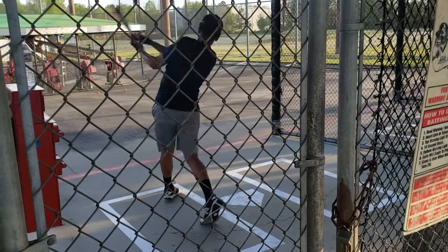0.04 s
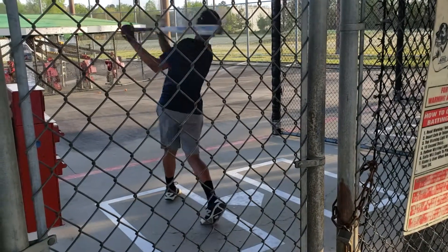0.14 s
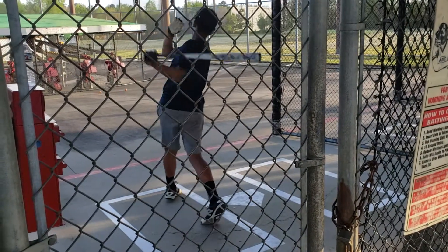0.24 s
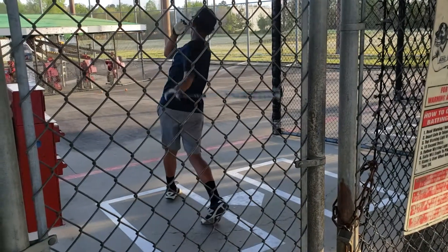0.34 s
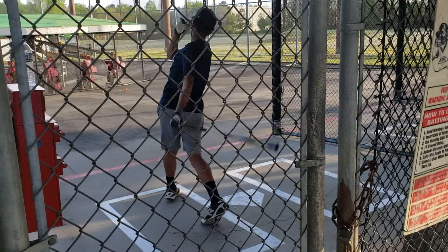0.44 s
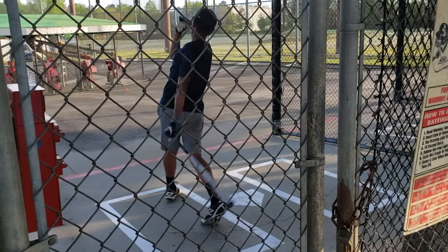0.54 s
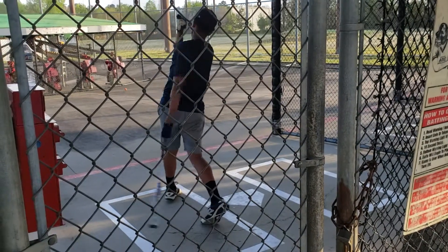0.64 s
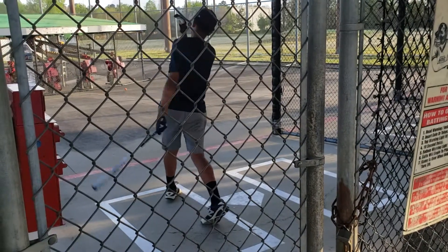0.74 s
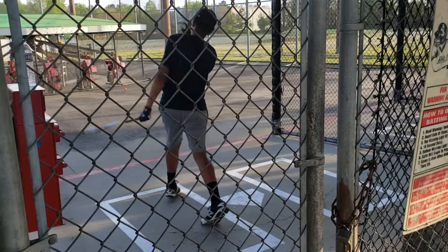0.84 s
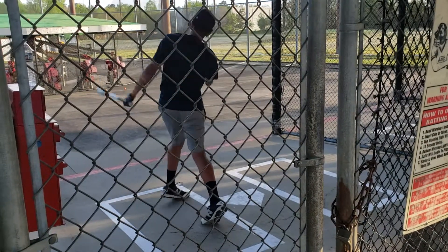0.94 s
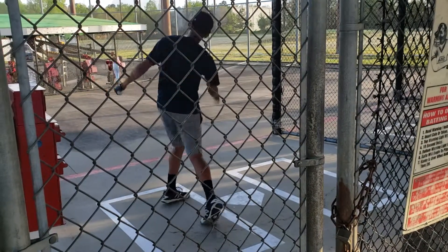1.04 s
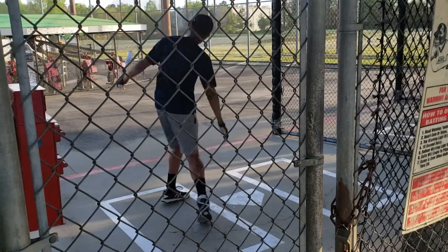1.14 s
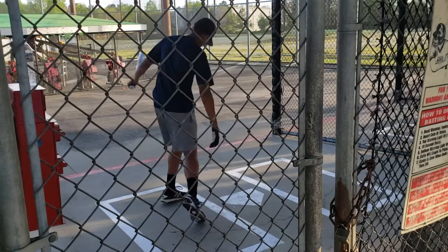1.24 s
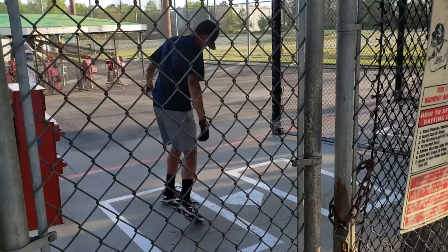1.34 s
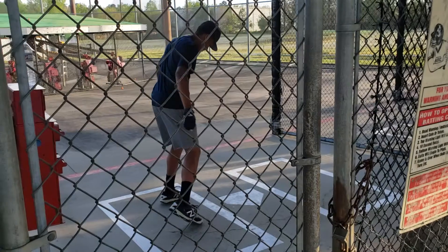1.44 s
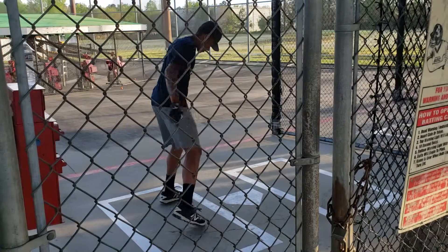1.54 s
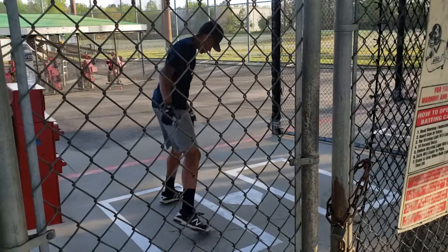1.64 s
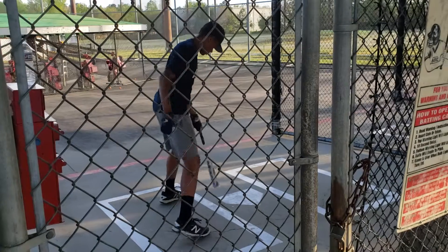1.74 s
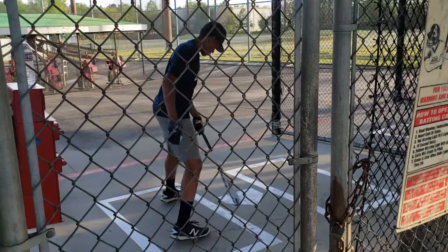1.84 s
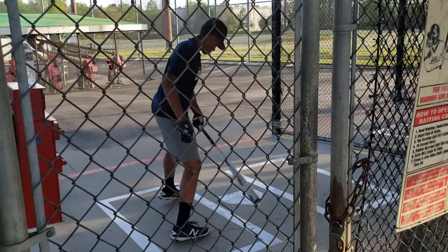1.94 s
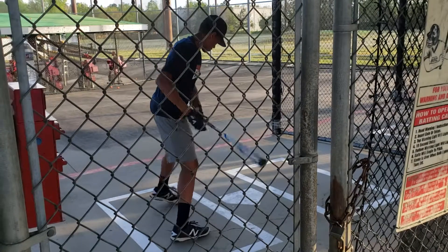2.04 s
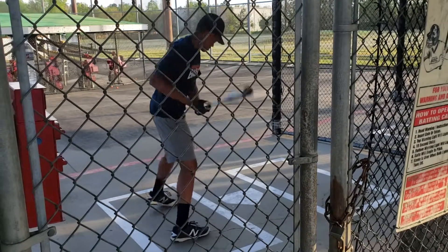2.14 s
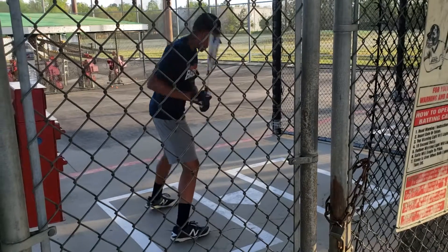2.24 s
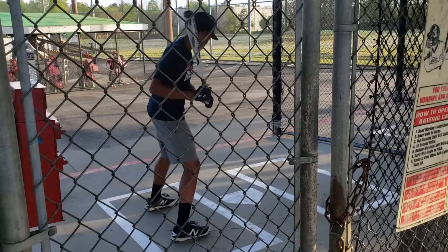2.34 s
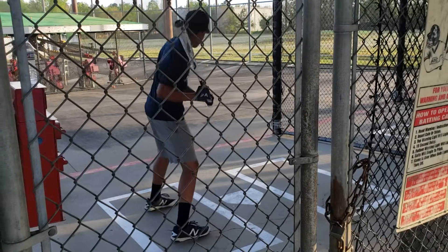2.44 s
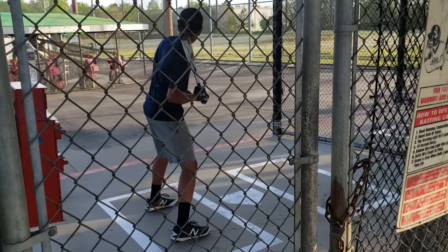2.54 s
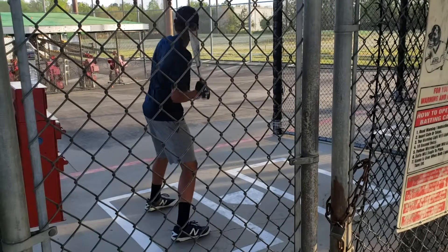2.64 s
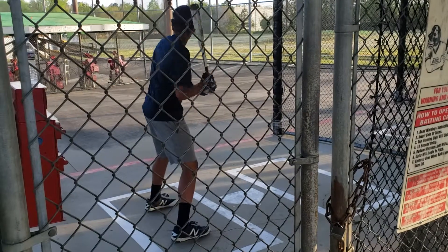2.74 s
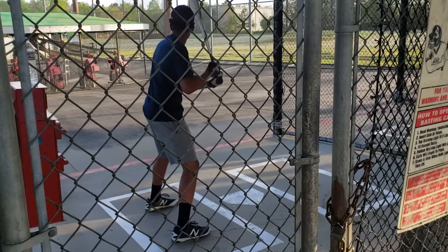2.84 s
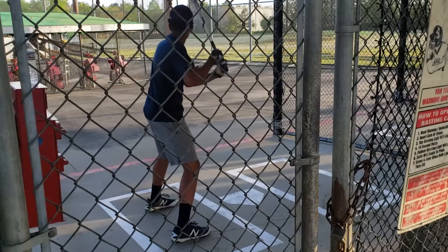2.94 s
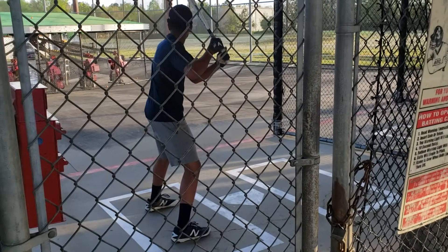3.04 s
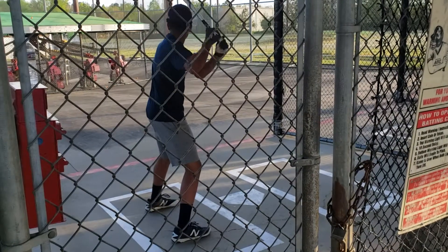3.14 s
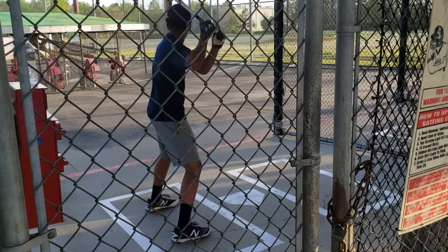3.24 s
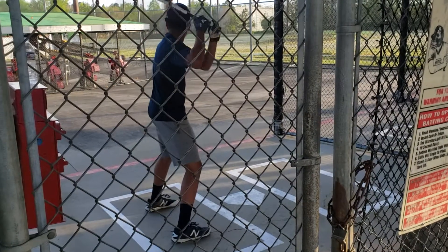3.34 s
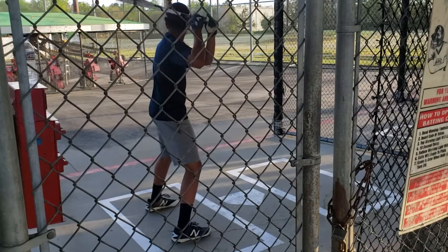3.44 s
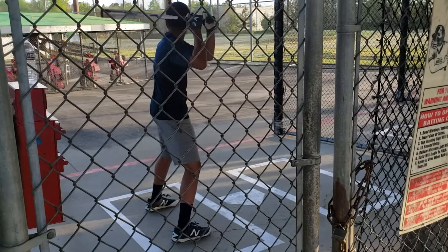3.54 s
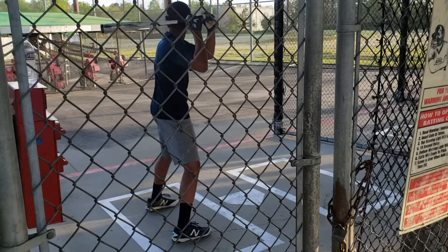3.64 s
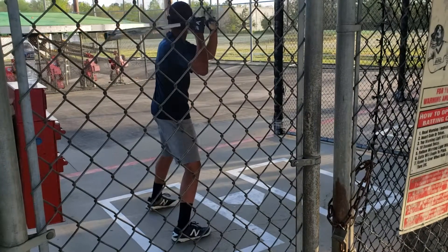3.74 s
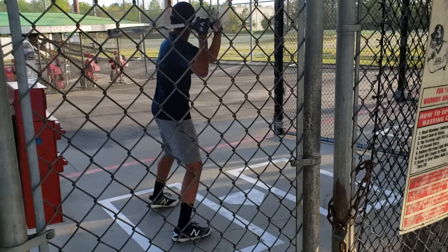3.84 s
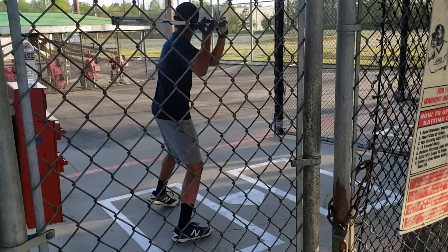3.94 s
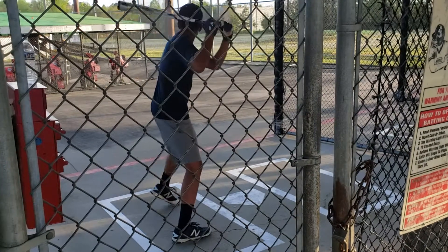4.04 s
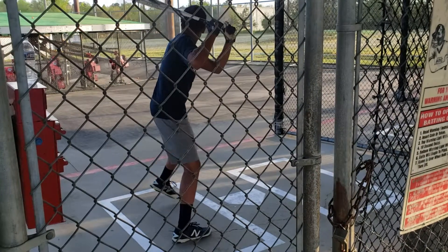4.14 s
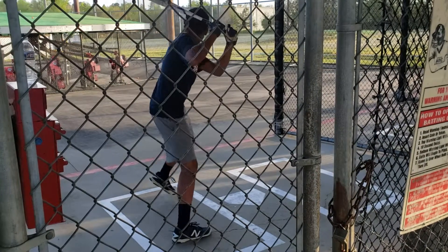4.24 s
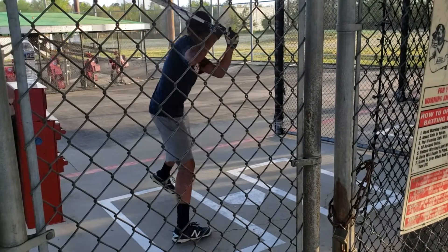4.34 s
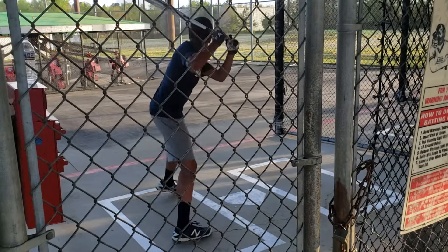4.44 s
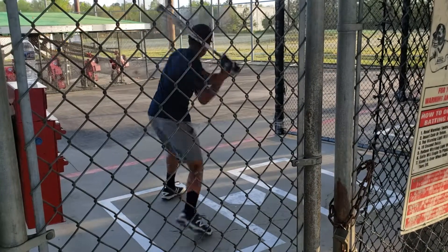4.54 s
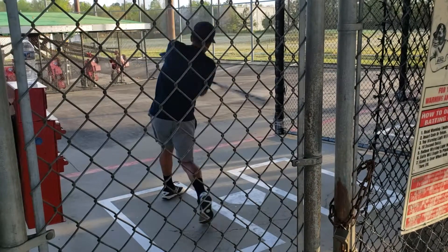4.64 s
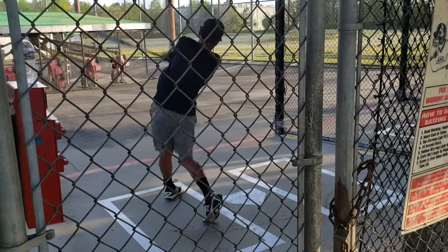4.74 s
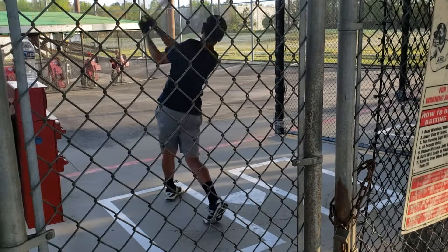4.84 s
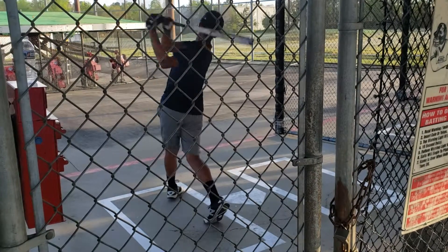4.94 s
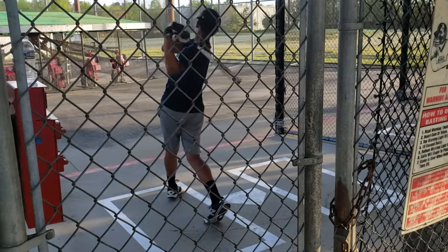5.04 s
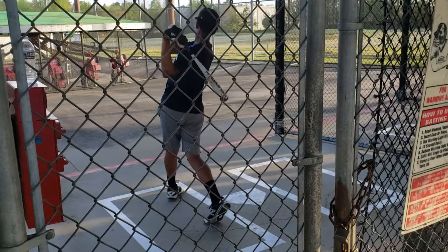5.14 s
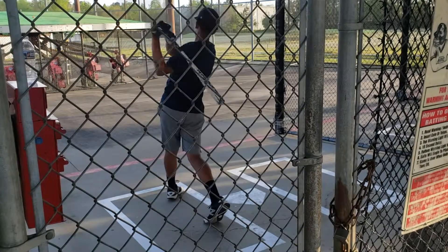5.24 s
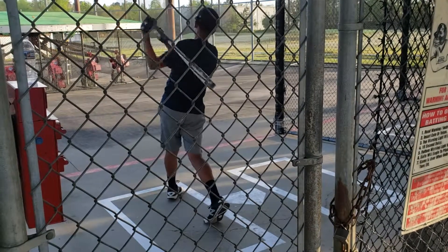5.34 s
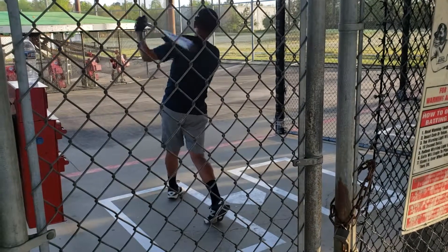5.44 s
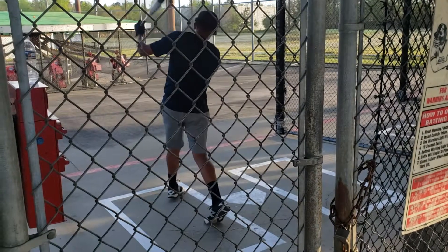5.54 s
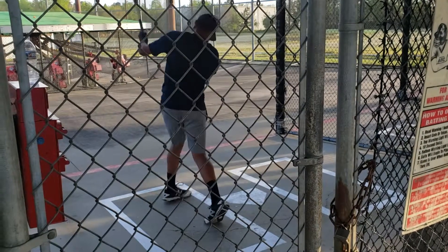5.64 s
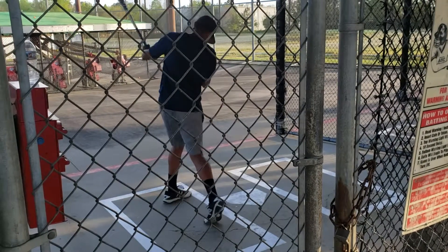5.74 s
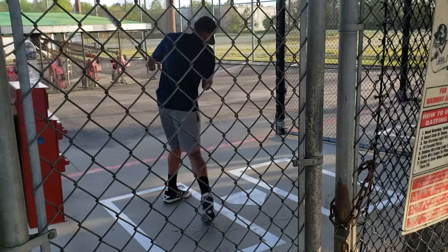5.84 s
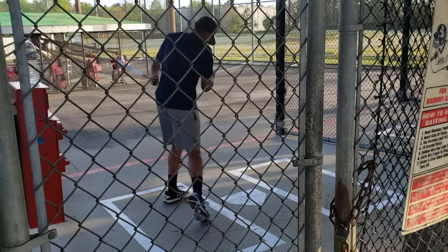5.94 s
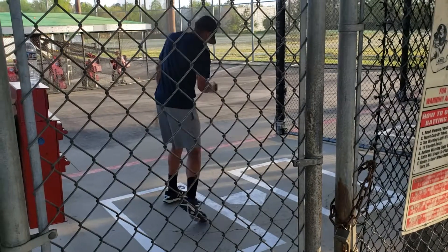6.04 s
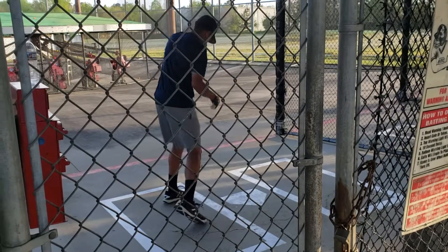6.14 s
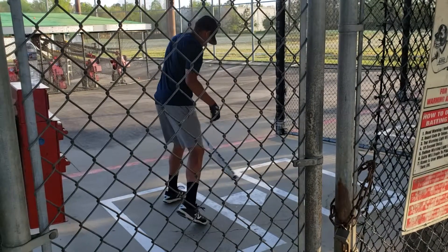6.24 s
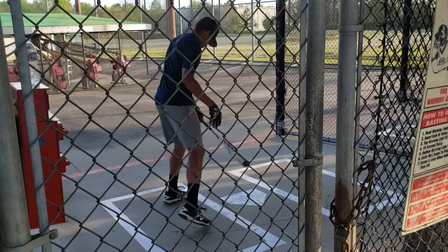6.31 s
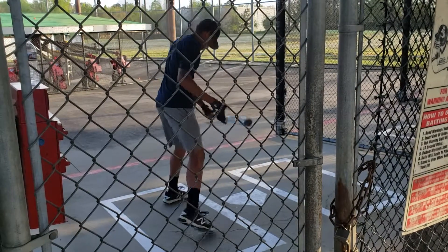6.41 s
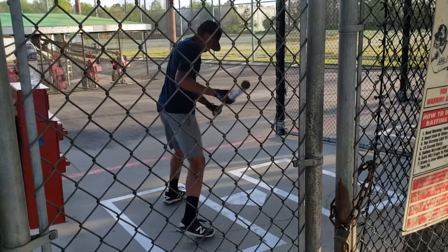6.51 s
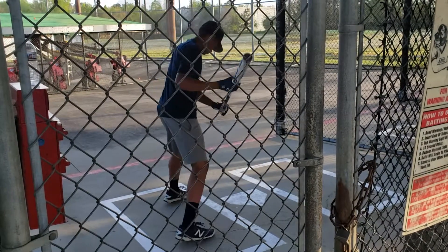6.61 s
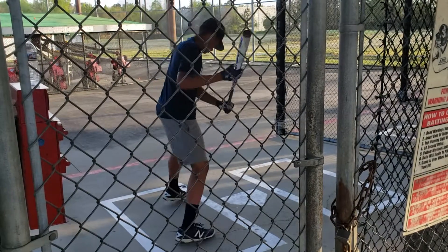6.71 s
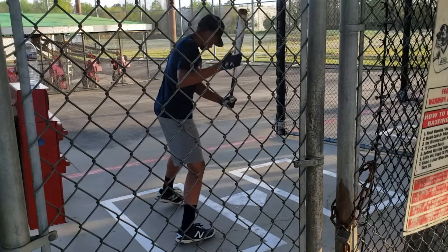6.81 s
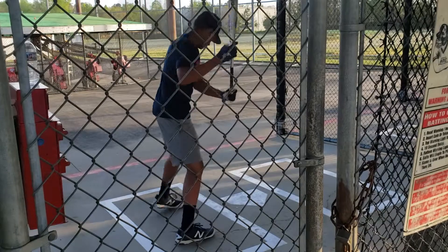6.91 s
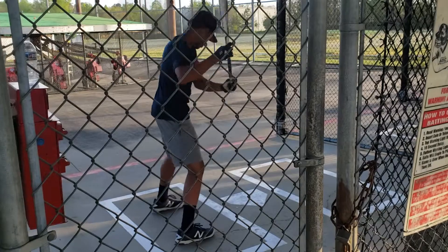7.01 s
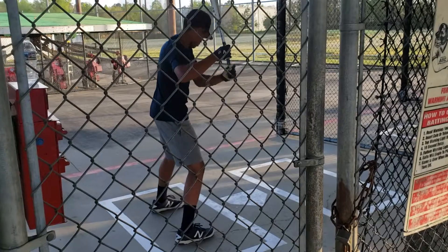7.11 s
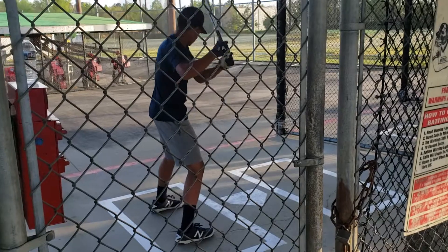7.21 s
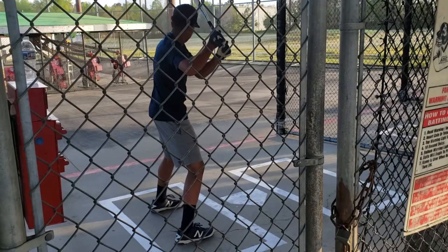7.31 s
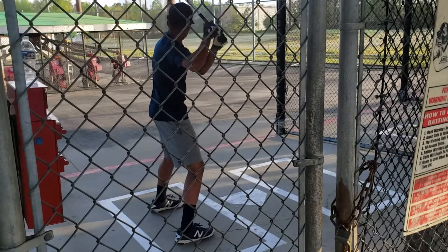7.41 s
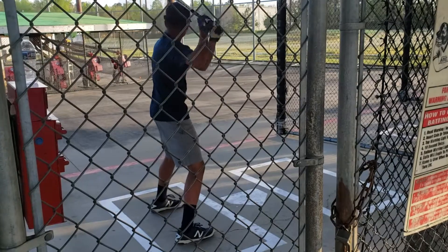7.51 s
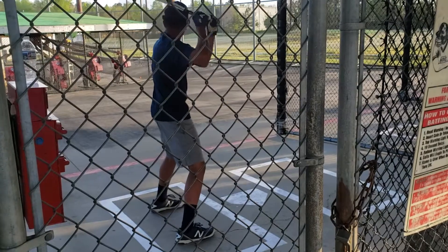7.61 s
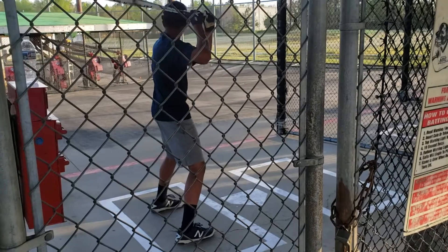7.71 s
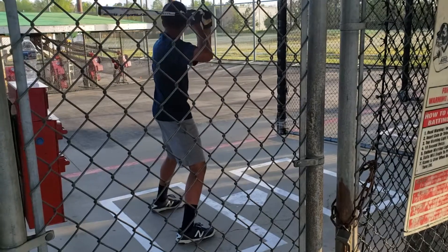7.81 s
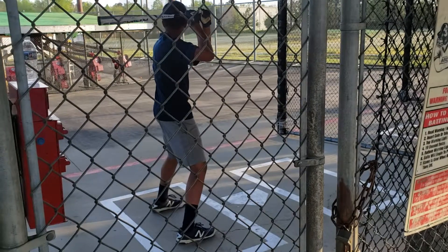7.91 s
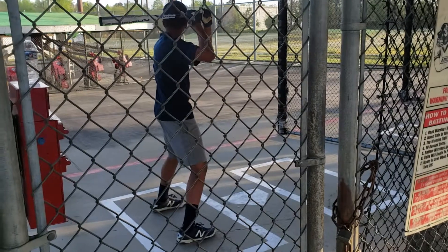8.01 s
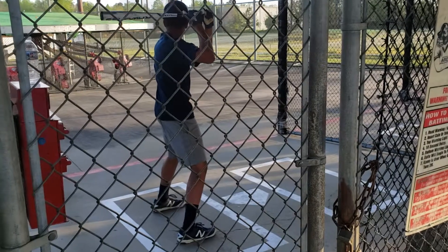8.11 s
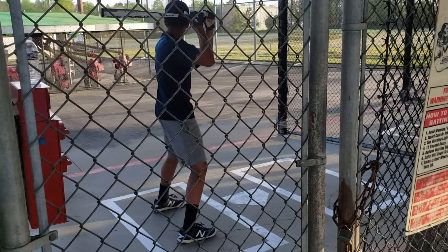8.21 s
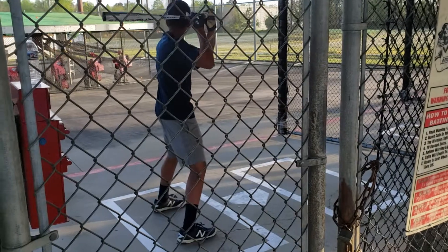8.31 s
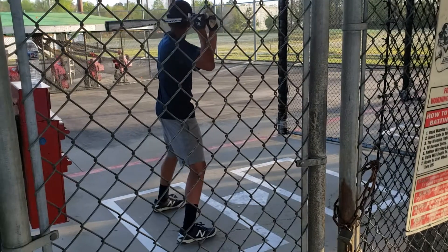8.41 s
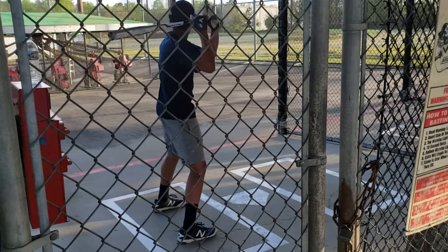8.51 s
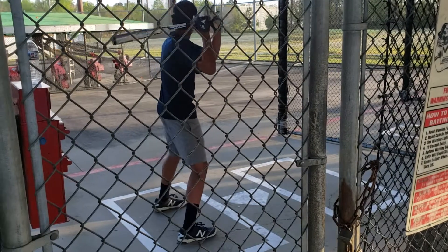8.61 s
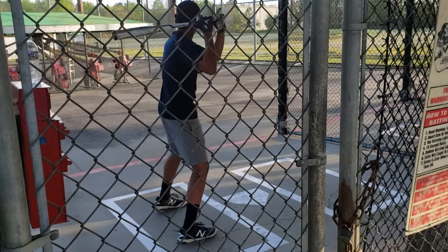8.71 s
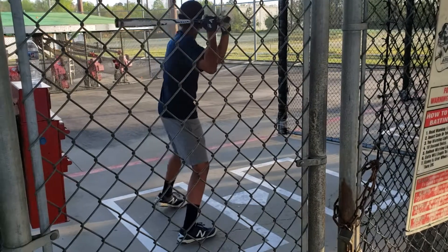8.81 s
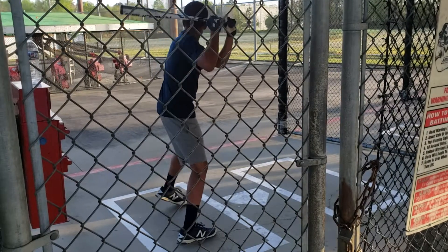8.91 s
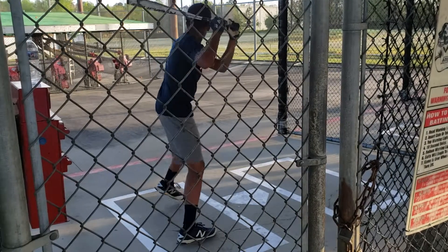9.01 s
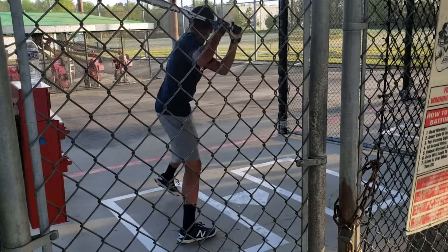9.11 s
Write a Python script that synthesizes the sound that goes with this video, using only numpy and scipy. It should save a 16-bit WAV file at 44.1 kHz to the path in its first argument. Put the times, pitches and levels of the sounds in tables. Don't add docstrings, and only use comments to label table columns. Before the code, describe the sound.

A stereo phone behind a fence picks up outdoor batting cages under a low roof. At 0 s a neighbouring aluminium bat is already ringing, its bright ping dying within half a second. The low motor hum, distant hiss and thin air are held down, then swell back around 2 to 3 s. Faint distant rings, light brushes and a dull scuff at 1.8 s pass by. At 2.3-2.5 s a gate hinge gives a short, gritty, high squeak, followed by tiny wire ticks until 3.2 s. At 3.37 s a ball thuds deeply into padding, with a softer thump at 3.8. A machine arm knocks at 4.16 s; at 4.7 s the nearest bat cracks loudly and pings, another bat ringing just after, with short roof echo. The background drops again. Net brushes, a small tap at 6.05 s and faint rings near 7 s follow; hum returns, and another hollow knock comes at 9.04 s.

```python
import sys
import numpy as np
from scipy import signal
from scipy.fft import rfft, irfft, next_fast_len
from scipy.io import wavfile
from scipy.ndimage import uniform_filter1d, map_coordinates

SR = 44100
rng = np.random.default_rng(int(sys.argv[2]) if len(sys.argv) > 2 else 0)


def attenuation_scalar(level_db):
    decades = np.asarray(level_db, float) / 20
    return 10 ** decades


def bounce(signal):
    frames = np.transpose(np.atleast_2d(signal))
    limited = np.clip(frames, -1, 1)
    pcm = np.round(limited * 32767).astype(np.int16)
    wavfile.write(sys.argv[1], SR, pcm)


N = 403956
EARLY = SR // 10

# start [s], ring [dB], crack [dB], roof echo [dB]
HITS = [
    (-.012, -16.5, -17, -6),
    (4.7092, -12, -7.5, -8.5),
    (4.7925, -15.5, -42, -14.5),
]
# frequency [Hz], level [dB per Hz]
CRACK = [(150, -26), (600, -1.5), (1400, -6), (2200, -12.5), (4200, -7.5), (5000, -13), (6300, -4.5),
         (8100, -6), (8800, -20), (13500, -8), (16400, -36), (16800, -67.5)]
# delay [s], level [dB], lead at the left port [s]
WALLS = [(.0022, -1.5, 0), (0.011, -4.5, 0.0028), (0.0161, -4, 0.0032), (.02, -7.5, 0.013),
         (0.035, -12, -0.0097)]
NEAR_BAT_HZ = (520, 760, 2594, 3068, 3148, 3250, 4170, 4205, 4440, 4523, 6347, 7290, 8100, 10800, 13280)
NEXT_BAT_HZ = (265, 400, 720, 2606, 2770, 2853, 3189, 3425, 5225, 5600, 7400)
THIRD_BAT_HZ = (2611, 2805, 2870, 3418)
# level [dB], swell [s], decay t60 [s]
NEAR_BAT_RING = [(-6.5, 0.015, 0.1), (-8, 0.0071, 0.13), (-4, .002, .12), (-16.5, 0.0027, 0.13),
                 (3, 0.0044, 0.20435), (-14.5, .003, 0.12), (-5, 0.011, 0.3), (4.5, 0.0074, 0.15),
                 (-12.5, .01, 0.41), (-15, 0.0089, 0.39), (-1.5, 0.006, 0.15), (-10, 0.0071, .1),
                 (-13.5, 0.002, .08), (-25.5, .005, .1), (-16.5, .008, .07)]
NEXT_BAT_RING = [(-8.5, .01, 0.149), (-13.5, 0.0086, 0.2078), (-22, .01, 0.18), (-3, .005, 0.22),
                 (-13, .01, 0.48), (-7.5, 0.01032, 0.46), (-3, .005, 0.23), (2, 0.00796, 0.16),
                 (-11.5, .005, 0.2234), (-20, .01, 0.24), (-22, .005, 0.19)]
THIRD_BAT_RING = [(-16, .015, 0.36), (-2.5, 0.01662, 0.22693), (-9.5, .02, 0.23), (5, .003, 0.07883)]
# start [s], level [dB], rise [s], decay t60 [s], brightness [dB per octave]
THUDS = [(3.367, -17, 0.0066, 0.25, 1), (3.385, -17, 0.01799, 0.44, 1.5), (3.83, -23.5, .03, 0.3, -1)]
# frequency [Hz], level [dB per Hz]
PAD = [(35, -33.5), (60, 1), (197, 0), (267, -13), (337, -5), (632, -11.5), (762, -10.5), (1080, -16),
       (1190, -22), (4700, -33), (5400, -30), (8820, -54.5), (12500, -61), (15800, -71.5)]
# frequency [Hz], level [dB], decay t60 [s]
SLAB = [(105.5, -1, 0.38), (133.83, 5, 0.1134), (164, 0, 0.1368), (211.4, -0.5, 0.28), (330.55, -0.5, 0.24),
        (370, -5.5, 0.18), (441, -10, 0.266), (537, -14, 0.48), (704, -6, 0.27)]
# start [s], level [dB]
SLAB_HIT = (3.3655, -21.5)
# start [s], knock [dB], click [dB], shudder [dB]
ARMS = [(4.1626, -19, -49.5, -31), (9.0428, -15.5, -49, -24.5)]
# frequency [Hz], level [dB], decay t60 [s]
FRAME = [(296, -8.5, 0.22), (352, 10.5, 0.053), (486.26, -7, 0.054)]
# delay [s], frequency [Hz], level over the knock [dB], decay t60 [s]
CLANK = (.02, 920, 0, .045)
# start [s], level [dB]
WINDUPS = [(3.778, -66), (8.70, -63)]
# time [s], pitch [Hz], push [dB]
HINGE = [(2.24, 1657, -65), (2.29, 1627, -33), (2.34, 1620, -25.5), (2.37, 1617, -29.5), (2.41, 1622, -35),
         (2.44, 1614, -50), (2.5, 1633, -47), (2.575, 1615, -52.5), (2.63, 1579, -64.5)]
# multiple of the pitch, level [dB]
UPPER = [(3, 4), (4, -4.5), (5, -12), (6, -22), (7, -19), (8, -22.5)]
# start [s], level [dB], rise [s], decay t60 [s], lowest frequency [Hz]
BRUSHES = [(.826, -54.5, .003, 0.19, 2200), (.97, -64.5, .01, 0.18, 5000), (2.07, -60.5, .01, .25, 5000),
           (4.645, -52.5, 0.0029, 0.073, 4200), (4.947, -38, .004, 0.17, 1490),
           (4.99, -50, 0.018, 0.38, 4000), (5.225, -65.5, .01, 0.52, 8095), (5.65, -62, .02, .2, 8000),
           (6.0503, -35.5, .0003, 0.019, 1000), (6.056, -48, .006, .22, 1506), (6.93, -68, 0.042, .4, 9160),
           (7.192, -61, .005, 0.1985, 3000)]
# start [s], level [dB], rise [s], decay t60 [s], centre [Hz]
SCUFFS = [(1.829, -44, 0.002, 0.034, 3380), (4.52, -36, .012, 0.1, 2389)]
# start [s], peak [dB]
TICKS = [(2.4794, -58), (2.4933, -50), (2.6297, -56.5), (2.809, -45), (2.9184, -58.5), (2.9502, -45),
         (3.0882, -50), (3.1696, -66.5), (3.2261, -45.5), (4.8624, -57), (5.1893, -52), (7.6409, -67)]
# start [s], frequency [Hz], level [dB], rise [s], decay t60 [s]
FAR = [(.47, 5301, -53.5, .005, 0.11), (.73, 4250, -50.5, 0.0555, 0.6157), (1.655, 4750, -55.5, .01, .15),
       (1.755, 2033, -38, 0.00359, 0.056), (5.5, 3252, -49.5, .03, 0.5165),
       (5.59, 2140, -45.5, 0.062, 0.71), (5.0, 7199, -54.5, .01, .5), (6.93, 4670, -51.5, .01, 0.11),
       (6.97, 3850, -40, .01, 0.1105)]
# start [s], frequency [Hz], level [dB], ramp [s], length [s]
POST = (1.448, 551, -51.5, .02, .168)
# start [s], end [s], frequency [Hz], level [dB]
LOADS = [(-.1, 1.099, 82.94, -34), (1.627, 2.2, 81.87, -37), (2.362, 2.68, 83.6, -37),
         (2.846, 3.2, 83.9, -30), (3.4, 4.27, 82, -33), (4.456, 4.753, 80.72, -29.5), (4.883, 5.5, 81, -29),
         (5.746, 6.4, 80.4, -40.5), (2.393, 3.406, 74.8, -40.5), (6.447, 7.45, 76, -38.5),
         (7.55, 7.9, 75.5, -31.5), (7.994, 9.3, 75, -39), (7.439, 8.3, 102, -38.5)]
# frequency [Hz], level [dB per Hz]
MOTORS = [(15, -55), (25, -18), (59, -2.5), (81, 0.5), (155, -9), (179, -13), (290, -12.5), (408, -17),
          (438, -14), (514, -24), (649, -22), (912, -18), (1050, -22), (1800, -34.5), (2340, -50),
          (3960, -120)]
# frequency [Hz], width [Hz], level over the motors [dB]
WHINES = [(150.5, 4, -8), (297.71, 8, -10), (361.2, 13, -6), (439.8, 8, -8), (792, 22, -11.5),
          (910, 18, -10.5)]
# frequency [Hz], level [dB per Hz]
HISS = [(900, -42.5), (1300, -7), (2000, -1), (3300, -6.5), (4300, -9.5), (4800, -6.5), (5400, -12),
        (8100, -19), (8500, -48.5), (10000, -64)]
# frequency [Hz], level [dB per Hz]
AIR = [(6000, -27.5), (8500, 3.5), (11000, 1), (14500, -2), (15700, -8.5), (16000, -34)]
# time [s], air [dB], hiss [dB], half length [s]
SWISHES = [(1.0, 4, -0.5, 0.139), (2.147, 3, -0.5, .1), (2.428, 7, 7, 0.0393), (3.47, -9, -1, 0.071),
           (3.88, 3.5, -1.5, .1), (4.68, 12, 0.5, 0.11), (4.99, 1, 9.5, 0.05173), (5.17, 8, 2.5, .08),
           (5.61, 1.5, 3, 0.11), (7.072, 4, 0, 0.1112), (8.877, 5.5, 2, .1)]
# frequency [Hz], decay t60 [s]
ROOF = [(100, 0.2), (500, 0.44), (2500, 0.38), (6000, 0.36744), (14000, 0.18)]
# frequency [Hz], left-right likeness [0 to 1]
ALIKE = [(40, 0.7969), (150, 0.9774), (500, 0.9276), (1200, 0.55), (3000, 0.32), (7000, 0.05), (12000, .05)]
# start [s], depth [dB], hold [s], release [s]
DUCKS = [
    (-.3, 7.5, 2.45, 0.78),
    (4.702, 7, 2.16, 0.79),
]

LEAD_S = 0.00018
BLOW_DB, BLOW_LEAD_S = 8, .00004
RING_LEAD_S = .00005
SECOND_DB, SECOND_GROWS = -46.5, 0.232
UPPER_DB, UPPER_GROWS = -59.5, 0.915
GRIT_DB, GRIT_GROWS = -56.5, .9
CATCH_S, CATCH_WIDTH_S, CATCH_DIP_DB, CATCH_GRIT_DB = 2.387, 0.01091, 18, 12
SLIP_S, SLIP_WIDTH_S, SLIP_DB = 2.403, .024, 12.5
RATTLE_S, RATTLE_DB, RATTLE_RISE_S, RATTLE_T60_S = 2.42, -33.5, 0.03834, 0.46
RATTLE_HZ, RATTLE_CLIMB_HZ_PER_S, RATTLE_END_S = 1648.7, 87, 2.552
BRUSH_TOP_HZ, FAR_WIDTH_HZ = 13000, 155.7
LOAD_RAMP_S = 0.13
MOTOR_DB, HISS_DB, AIR_DB = -39.5, -50, -72.5
AIR_FOLLOWS = 1.2
DUCK_S, CREEP_DB_PER_S = .2, .5


def bats():
    track, t = blank()
    hz_lists = (NEXT_BAT_HZ, NEAR_BAT_HZ, THIRD_BAT_HZ)
    ring_lists = (NEXT_BAT_RING, NEAR_BAT_RING, THIRD_BAT_RING)
    for modes_hz, rings, (s, ring_db, crack_db, wet_db) in zip(hz_lists, ring_lists, HITS):
        snap = unit(filtered(rng.standard_normal(len(t)), lambda hz: attenuation_scalar(along(CRACK, hz))))
        snap = snap * attenuation_scalar(crack_db - 60 * t / 0.0079)
        blow = attenuation_scalar(crack_db + BLOW_DB) * np.sin(2 * np.pi * 6500 * t) * attenuation_scalar(-60 * t / .0015)
        barrel = attenuation_scalar(ring_db) * late(swung(modes_hz, rings, t, blur=0.89), RING_LEAD_S)
        direct = barrel + late(both(attenuation_scalar(-1.0) * snap + blow), BLOW_LEAD_S)
        add(track, s, direct + attenuation_scalar(wet_db) * echo(barrel[0]) + attenuation_scalar(4) * echo(snap))
        for delay, db, lead_s in WALLS:
            add(track, s + delay, attenuation_scalar(db) * late(both(snap + 0.88 * blow)[:, :SR // 50], lead_s))
    return track


def swung(modes_hz, rings, t, blur):
    out = np.zeros((2, len(t)))
    for hz, (db, swell, t60) in zip(modes_hz, rings):
        shared, beat, *own = [wobble(148.58, count=len(t)) for _ in range(4)]
        own = np.array(own)
        tone = np.sin(2 * np.pi * hz * t + blur * (shared + 0.597 * own))
        out += attenuation_scalar(db - 60 * t / t60 + 2.3 * beat + 2.4 * own) * (1 - np.exp(-t / swell)) * tone
    return out


def knocks():
    return backstop() + pitching_arms()


def backstop():
    track, t = blank()
    for s, db, rise, t60, tilt_db in THUDS:
        color = lambda hz: attenuation_scalar(along(PAD, hz) + tilt_db * np.log2((hz + 1) / 300))
        add(track, s, attenuation_scalar(db) * burst(color, t, rise, t60))
    s, db = SLAB_HIT
    boom = attenuation_scalar(db) * ring(SLAB, t) * (1 - np.exp(-t / 0.003397))
    add(track, s, late(both(boom), LEAD_S) + attenuation_scalar(-1.5) * echo(boom))
    return track


def pitching_arms():
    track, t = blank()
    for s, knock_db, click_db, shudder_db in ARMS:
        body = attenuation_scalar(knock_db) * ring(FRAME, t) * (1 - np.exp(-t / 0.009))
        click = rng.standard_normal(len(t)) * attenuation_scalar(click_db + 16.5 - 60 * t / .015)
        click = filtered(click, lambda hz: 1 / (1 + (4500 / (hz + 1)) ** 6))
        add(track, s, late(both(body + click), LEAD_S) + echo(click))
        clank = attenuation_scalar(knock_db) * ring([CLANK[1:]], t) * (1 - np.exp(-t / 0.0046))
        add(track, s + CLANK[0], late(both(clank), LEAD_S))
        housing = lambda hz: 1 / (1 + ((hz - 340) / 130) ** 2) + 0.17 / (1 + ((hz - 950) / 200) ** 2)
        add(track, s + .021, attenuation_scalar(shudder_db) * burst(housing, t, 0.0049, 0.61))
    spring = lambda hz: 1 / (1 + ((hz - 11300) / 1800) ** 4)
    for (s, db), (release, *_) in zip(WINDUPS, ARMS):
        add(track, s, attenuation_scalar(db) * burst(spring, t, 0.0037, 1.697) * (t < release - s))
    return track


def hinge():
    track, _ = blank()
    span = slice(round(HINGE[0][0] * SR), round(HINGE[-1][0] * SR))
    hz, push_db = [c[span] for c in curves(HINGE)]
    t = np.arange(N)[span] / SR
    over_db = push_db + 33
    catch = np.exp(-((t - CATCH_S) / CATCH_WIDTH_S) ** 2)
    slip_db = SLIP_DB * np.exp(-((t - SLIP_S) / SLIP_WIDTH_S) ** 2)
    fade = np.clip(np.minimum(t - t[0], RATTLE_END_S - t) / 0.023, 0, 1)
    phase = 2 * np.pi * np.cumsum(hz) / SR

    def partial(k, db, flutter_db):
        return np.array([attenuation_scalar(db + side_db + flutter_db * wobble(46.35, count=len(hz))) * np.sin(k * phase + turn * k)
                         for side_db, turn in ((4.948, 0.63), (2.8, -0.67))])

    first = partial(1, push_db - CATCH_DIP_DB * catch, flutter_db=0.7)
    second = partial(2, SECOND_DB + SECOND_GROWS * over_db + 0.3273 * slip_db, flutter_db=3.5)
    upper_db = UPPER_DB + UPPER_GROWS * over_db + slip_db
    upper = sum(partial(k, upper_db + db, flutter_db=4.5) for k, db in UPPER)

    age = np.clip(t - RATTLE_S, 0, None)
    turn = 2 * np.pi * (RATTLE_HZ * age + RATTLE_CLIMB_HZ_PER_S * age ** 2 / 2)
    beat = attenuation_scalar(RATTLE_DB - 60 * age / RATTLE_T60_S) * (1 - np.exp(-age / RATTLE_RISE_S))
    beat = beat * np.clip((RATTLE_END_S - t) / 0.014, 0, 1) * (np.sin(turn) + attenuation_scalar(-8.5) * np.sin(2 * turn))

    scrape = lambda f: 1 / (1 + (1800 / (f + 1)) ** 4) / (1 + (f / 5500) ** 6)
    grit = unit(pair(rng.standard_normal((2, len(hz))), scrape, LEAD_S))
    grit = attenuation_scalar(GRIT_DB + GRIT_GROWS * over_db + CATCH_GRIT_DB * catch) * grit
    add(track, HINGE[0][0], first + fade * (second + upper) + beat + grit)
    return track


def cages():
    track, t = blank()
    bands = [(*row, BRUSH_TOP_HZ) for row in BRUSHES]
    bands += [(*row, hz / np.sqrt(2), hz * np.sqrt(2)) for *row, hz in SCUFFS]
    for s, db, rise, t60, low_hz, high_hz in bands:
        band = lambda hz: 1 / (1 + (low_hz / (hz + 1)) ** 4) / (1 + (hz / high_hz) ** 4)
        add(track, s, attenuation_scalar(db) * burst(band, t, rise, t60))
    wire = lambda hz: 1 / (1 + (7000 / (hz + 1)) ** 6)
    for s, db in TICKS:
        add(track, s, attenuation_scalar(db - 1) * burst(wire, t[:SR // 20], .0003, .01))
    for s, hz, db, rise, t60 in FAR:
        add(track, s, attenuation_scalar(db) * burst(lambda f: 1 / (1 + ((f - hz) / FAR_WIDTH_HZ) ** 2), t, rise, t60))
    s, hz, db, ramp, length = POST
    hum = attenuation_scalar(db) * np.sin(2 * np.pi * hz * t) * np.clip(np.minimum(t, length - t) / ramp, 0, 1)
    add(track, s, late(both(hum), LEAD_S))
    return track


def hums(gain_db):
    t, sway_db, sway_hz = np.arange(N) / SR, 2.7 * wobble(8), 0.804 * wobble(8)
    tones = np.zeros(N)
    for start, end, hz, db in LOADS:
        load = np.clip(np.minimum(t - start, end - t) / LOAD_RAMP_S + .5, 0, 1) ** 2
        tones += attenuation_scalar(db) * load * np.sin(2 * np.pi * np.cumsum(hz + sway_hz) / SR)
    return attenuation_scalar([[.4], [-.4]]) * attenuation_scalar(0.5 + gain_db + sway_db) * tones


def yard(gain_db):
    t = np.arange(N) / SR
    stir_air_db, stir_hiss_db = np.zeros(N), np.zeros(N)
    for s, air, hiss, half in SWISHES:
        swish = np.clip(1 - np.abs(t - s) / (2 * half), 0, 1)
        stir_air_db += air * swish
        stir_hiss_db += hiss * swish
    motor_db = MOTOR_DB + gain_db
    hiss_db = HISS_DB + gain_db + stir_hiss_db
    air_db = AIR_DB + AIR_FOLLOWS * gain_db + stir_air_db
    tones = lambda hz: sum(attenuation_scalar(db) / np.sqrt(w) / (1 + ((hz - c) / w) ** 2) for c, w, db in WHINES)
    out = attenuation_scalar(motor_db + 4.5 + 0.97 * wobble(7)) * rush(lambda hz: attenuation_scalar(along(MOTORS, hz)), patchy_db=1.0)
    out += attenuation_scalar(motor_db - 5.0) * rush(tones, patchy_db=2.0)
    out += attenuation_scalar(hiss_db + 0.53 * wobble(6.5)) * rush(lambda hz: attenuation_scalar(along(HISS, hz)), patchy_db=2.0)
    out += attenuation_scalar(air_db + 0.68 * wobble(11)) * rush(lambda hz: attenuation_scalar(along(AIR, hz)), patchy_db=0.9859)
    return attenuation_scalar([[.3], [-.3]]) * out


def opened():
    t, gain_db = np.arange(N) / SR, np.zeros(N)
    for s, depth_db, hold, release in DUCKS:
        closing = 1 - np.exp(-np.clip(t - s, 0, None) / DUCK_S)
        opening = np.clip((s + hold + release - t) / release, 0, 1)
        gain_db -= (depth_db - CREEP_DB_PER_S * (t - s)) * closing * opening
    return gain_db


def echo(x):
    hz, t, z = signal.stft(rng.standard_normal((2, SR // 2)), SR, nperseg=256)
    tail = signal.istft(z * attenuation_scalar(-60 * t / along(ROOF, hz)[:, None]), SR, nperseg=256)[1]
    build_up = np.clip(np.arange(tail.shape[1]) / (0.0099 * SR), 0, 1)
    tail = pair(tail * build_up, np.ones_like, LEAD_S)
    return signal.fftconvolve(x[None], tail / np.linalg.norm(tail[0]), axes=1)[:, :len(x)]


def ring(modes, t):
    return sum(attenuation_scalar(db - 60 * t / t60) * np.sin(2 * np.pi * hz * t) for hz, db, t60 in modes)


def burst(gain, t, rise, t60):
    noise = unit(pair(rng.standard_normal((2, len(t))), gain, LEAD_S))
    return noise * (1 - np.exp(-t / rise)) * attenuation_scalar(-60 * t / t60)


def rush(gain, patchy_db):
    z = signal.stft(rng.standard_normal((2, N)), nperseg=512)[2]
    field = uniform_filter1d(rng.standard_normal(z.shape[1:]), size=6, axis=0)
    field = uniform_filter1d(field, size=14, axis=1)
    noise = signal.istft(z * attenuation_scalar(patchy_db * unit(field)), nperseg=512)[1][:, :N]
    return unit(pair(noise, gain, LEAD_S))


def pair(noise, gain, lead_s):
    turn = lambda hz: np.arccos(np.clip(along(ALIKE, hz), 0, 1)) / 2
    mid, side = filtered(noise, lambda hz: gain(hz) * np.array([np.cos(turn(hz)), np.sin(turn(hz))]))
    return late(np.array([mid + side, mid - side]), lead_s)


def late(x, lead_s):
    delay_s = np.array([[max(-lead_s, 0)], [max(lead_s, 0)]])
    return filtered(x, lambda hz: np.exp(-2j * np.pi * hz * delay_s))


def filtered(x, response):
    n = x.shape[-1]
    m = next_fast_len(n + SR // 8)
    return irfft(rfft(x, m) * response(np.fft.rfftfreq(m, 1 / SR)), m)[..., :n]


def wobble(rate, count=N):
    knots = rng.standard_normal(int(count * rate / SR) + 4)
    return map_coordinates(knots, [np.arange(count) * rate / SR])


def curves(rows):
    s, *cols = np.transpose(rows)
    return [np.interp(np.arange(N) / SR, s, c) for c in cols]


def along(points, hz):
    f, v = np.transpose(points)
    return np.interp(np.log(hz + 1), np.log(f + 1), v)


def unit(x):
    return x / np.sqrt(np.mean(x ** 2) + 1e-20)


def both(x):
    return np.array([x, x])


def blank():
    return np.zeros((2, N + EARLY)), np.arange(SR // 2) / SR


def add(track, s, sound):
    part = track[:, round(s * SR) + EARLY:][:, :sound.shape[1]]
    part += sound[:, :part.shape[1]]


def scene():
    gain_db = opened()
    near = bats() + knocks() + hinge() + cages()
    return near[:, EARLY:] + hums(gain_db) + yard(gain_db)


def top_cut(x):
    return signal.sosfilt(signal.butter(12, 16520, fs=SR, output="sos"), x)


def record(dry):
    mix = filtered(dry, lambda hz: np.where(hz < 15800, 1, attenuation_scalar(-19.0)))
    return top_cut(mix)


dry = scene()
out = record(dry)
bounce(out)
```